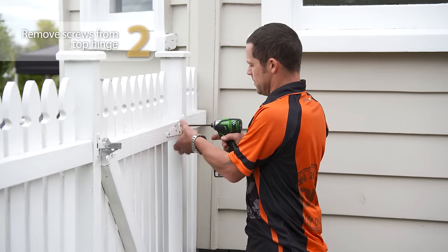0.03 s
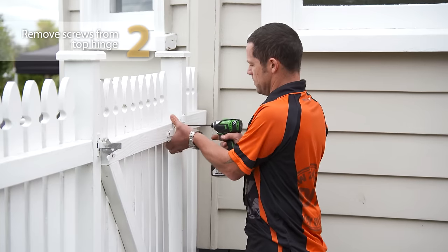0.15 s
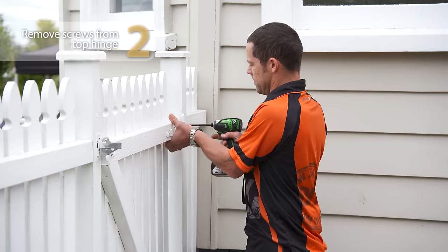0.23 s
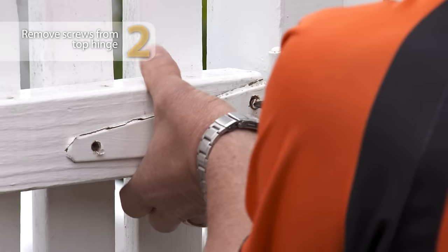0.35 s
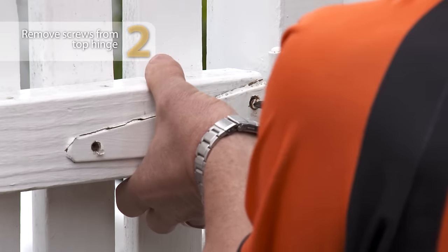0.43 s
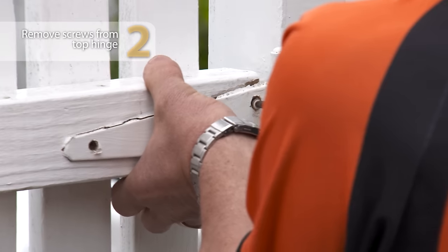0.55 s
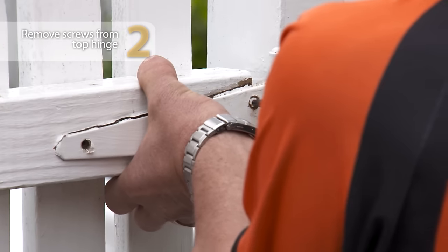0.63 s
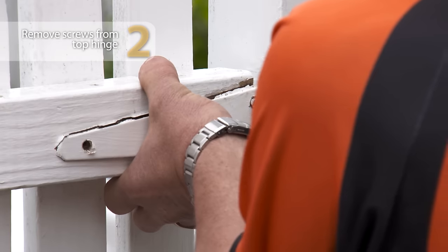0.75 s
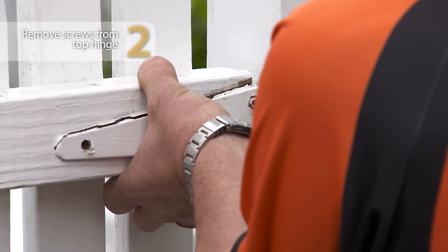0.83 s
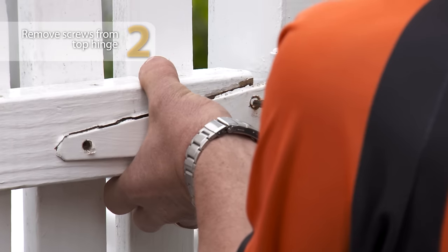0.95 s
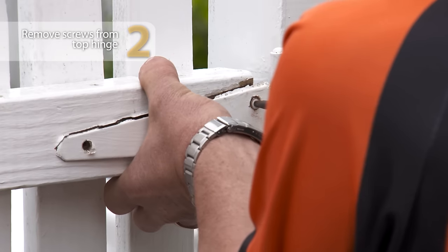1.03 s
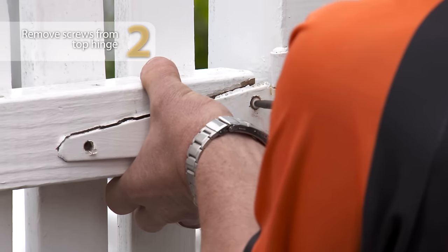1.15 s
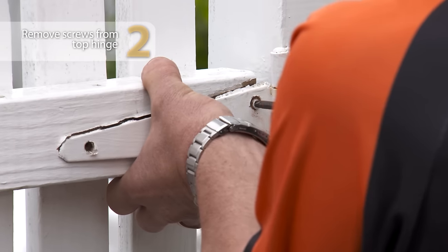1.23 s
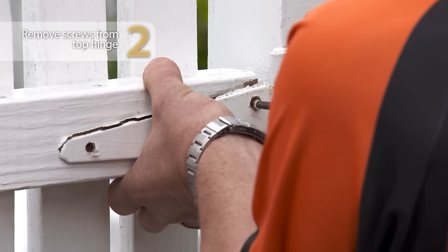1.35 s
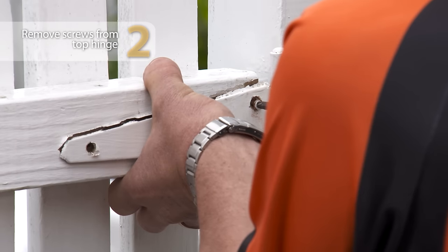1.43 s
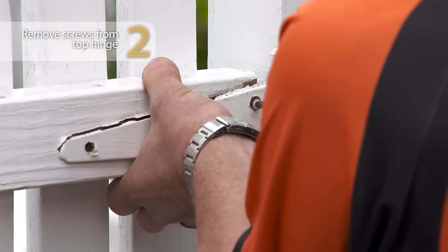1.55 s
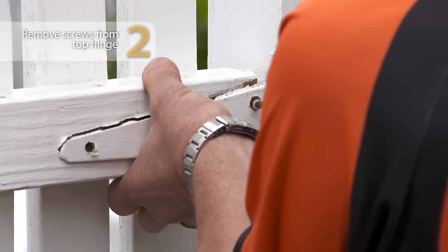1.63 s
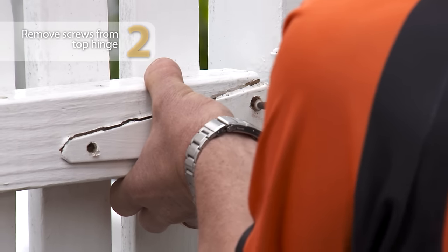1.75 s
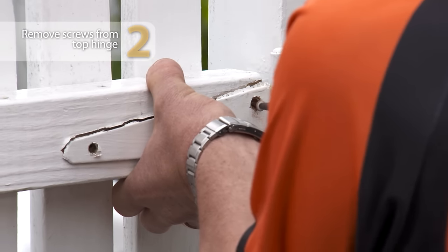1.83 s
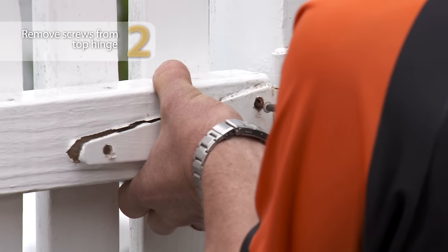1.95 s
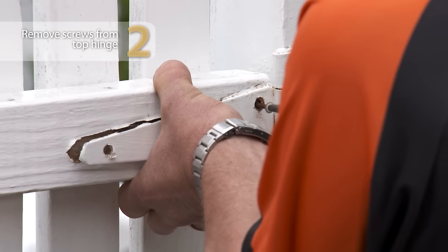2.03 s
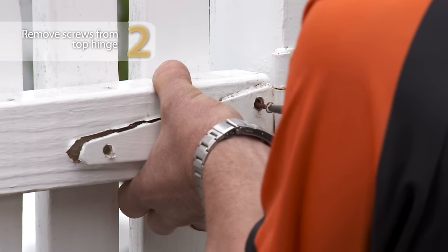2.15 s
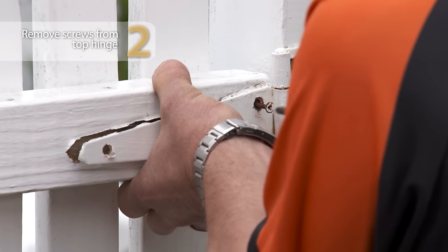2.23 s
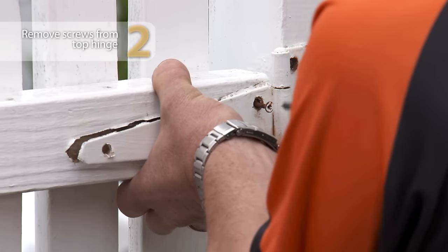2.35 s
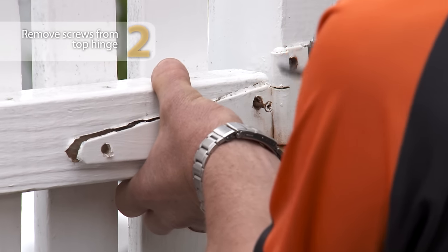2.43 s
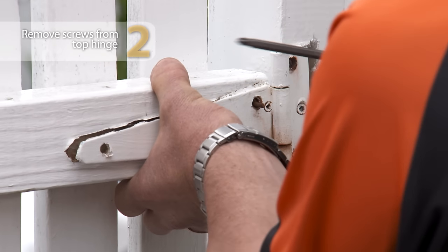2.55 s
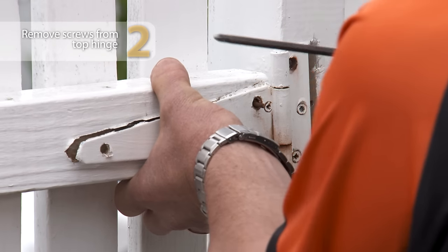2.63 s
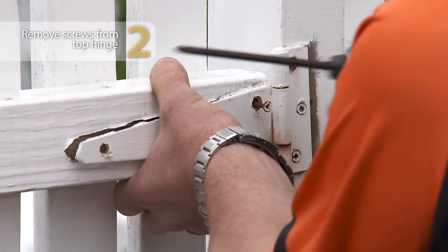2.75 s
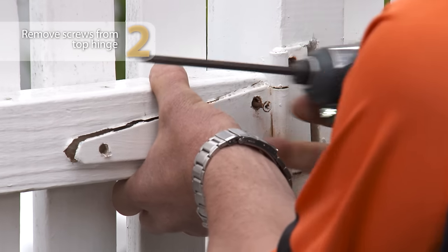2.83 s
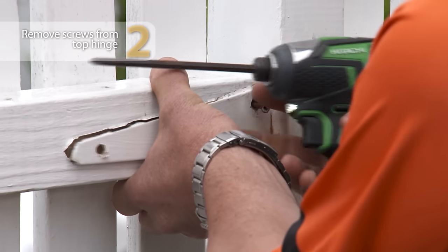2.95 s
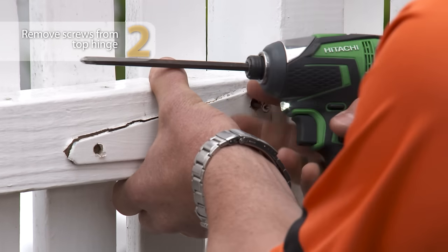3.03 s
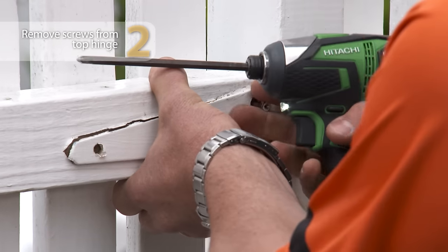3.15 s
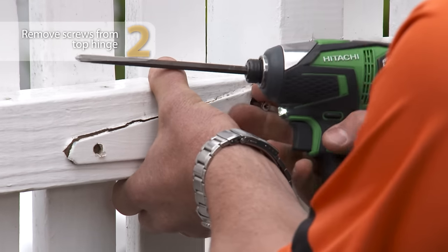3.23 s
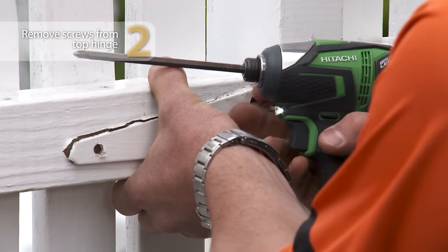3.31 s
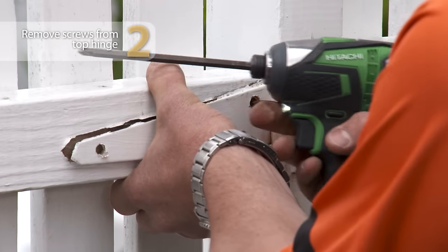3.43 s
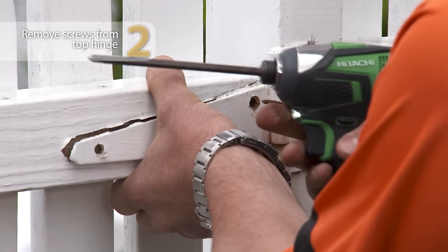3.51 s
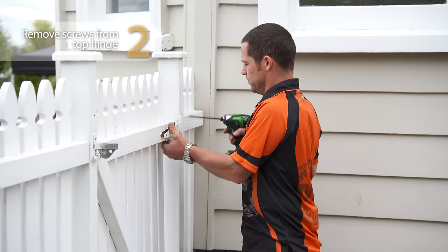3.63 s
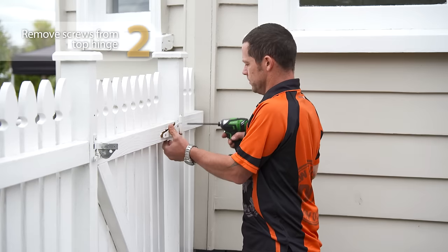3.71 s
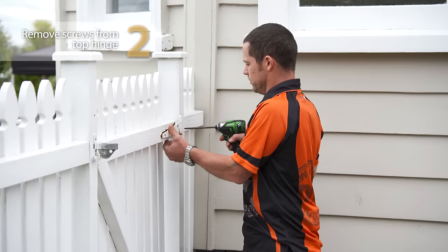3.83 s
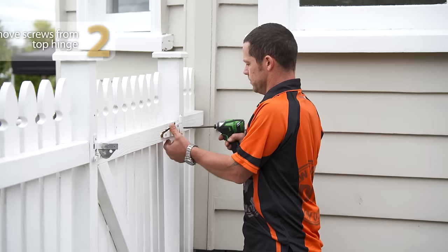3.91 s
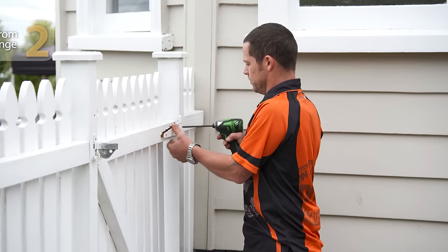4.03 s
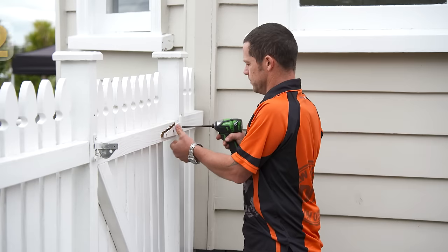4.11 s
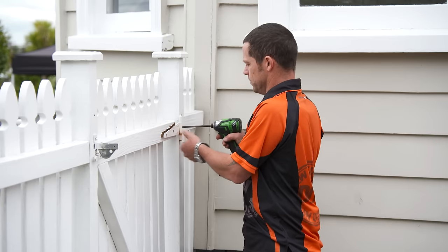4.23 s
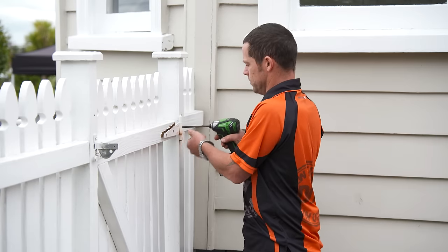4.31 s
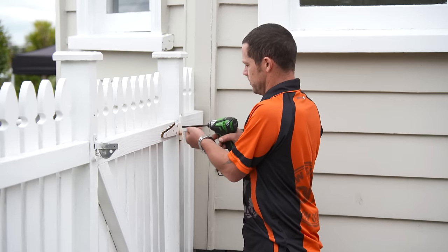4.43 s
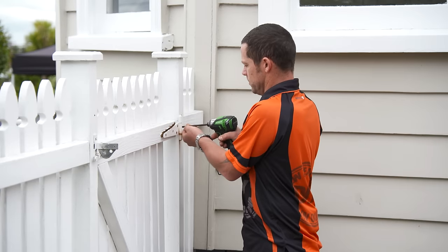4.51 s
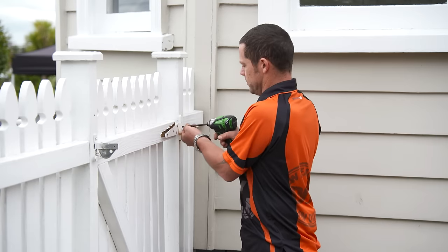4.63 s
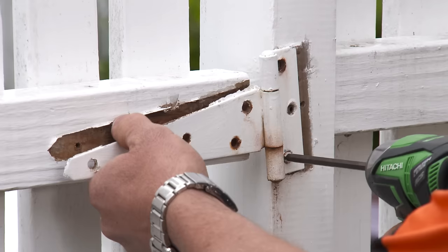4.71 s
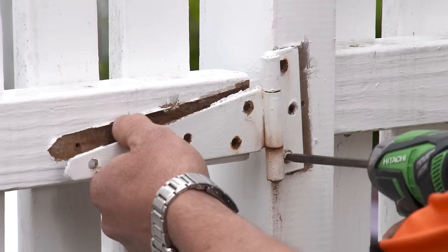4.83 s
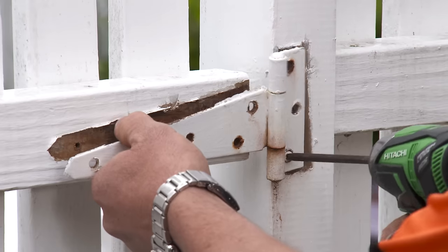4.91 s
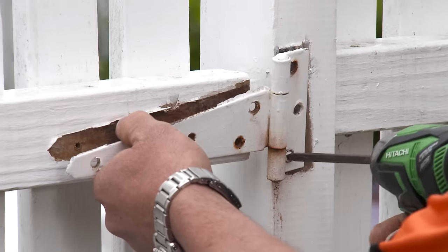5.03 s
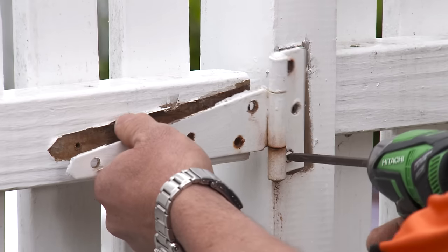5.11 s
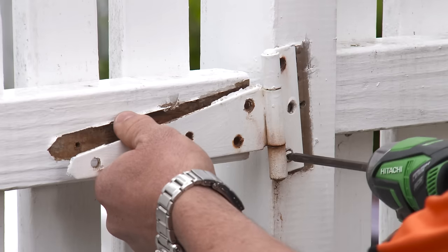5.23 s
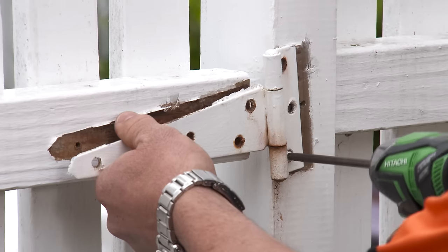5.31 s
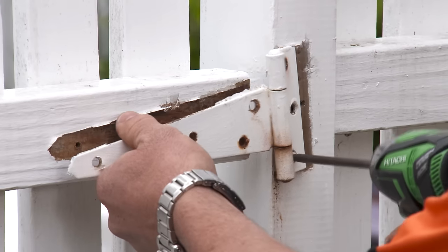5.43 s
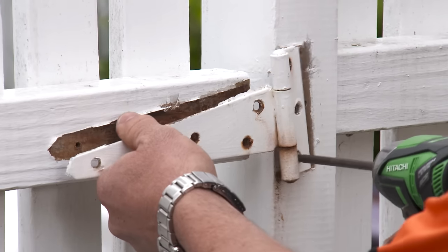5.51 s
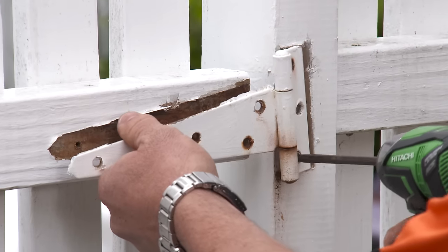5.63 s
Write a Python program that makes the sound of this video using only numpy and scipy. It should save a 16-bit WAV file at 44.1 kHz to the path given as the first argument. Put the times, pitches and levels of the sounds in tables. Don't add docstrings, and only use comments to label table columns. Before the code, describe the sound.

Outdoors, close up, a power driver whines and rattles while loosening hinge screws, then after a gap clatters in two hard impact bursts.

```python
import sys
import numpy as np
from scipy import signal
from scipy.fft import rfft, irfft
from scipy.io import wavfile
from scipy.ndimage import uniform_filter1d

SR = 44100
rng = np.random.default_rng(int(sys.argv[2]) if len(sys.argv) > 2 else 0)


def master(y):
    cut = np.clip(np.atleast_2d(y).T, -1, 1)
    pcm = np.round(cut * 32767)
    wavfile.write(sys.argv[1], SR, pcm.astype(np.int16))


def gain_from_db(level_db):
    decades = np.asarray(level_db, float) / 20
    return 10 ** decades


N = 249867
T = np.arange(N) / SR
SHORT, LONG = T[:3000], T[:6000]


def colour(x, points):
    hz, db = np.transpose(points)
    grid = np.fft.rfftfreq(x.shape[-1], 1 / SR) + 1
    gain = gain_from_db(np.interp(np.log(grid), np.log(hz), db))
    return irfft(rfft(x) * gain, x.shape[-1])


def unit(x):
    return x / np.sqrt(np.mean(x ** 2))


def walk(rate):
    levels = rng.standard_normal(size=8192)
    steps = levels[(T * rate).astype(int)]
    return unit(uniform_filter1d(steps, int(SR / rate)))


def control(tables, axis, off):
    out = np.full(N, float(off))
    for rows in map(np.array, tables):
        inside = (T >= rows[0, 0]) & (T <= rows[-1, 0])
        out[inside] = np.interp(T[inside], rows[:, 0], rows[:, axis])
    return uniform_filter1d(out, size=64)


def during(spans, rise, fall):
    levels = []
    for start, end, *db in spans:
        levels.append(sum(db) - rise * np.maximum(start - T, 0) - fall * np.maximum(T - end, 0))
    return np.max(levels, axis=0)


def ring(t, modes, scatter_db, stretch):
    hz, db, t60 = np.transpose(modes)[:, :, None]
    level, detune, phase = rng.standard_normal((3, len(modes), 1))
    fading = gain_from_db(db + scatter_db * level - 60 * t / (t60 * stretch))
    tones = np.sin(2 * np.pi * hz * (1 + 0.019 * detune) * t + phase)
    return (fading * tones).sum(axis=0)


def add(out, s, sound, db):
    i = int(s * SR)
    out[i:i + len(sound)] += (sound * gain_from_db(db) / np.abs(sound).max())[:N - i]


# (time [s], rate of current switching inside the motor [Hz])
MOTOR_SPEED = [
    [(.536, 88), (.601, 589), (.645, 900), (.665, 990), (.691, 914), (.76, 760)],
    [(1.085, 57), (1.16, 680), (1.2, 968), (1.225, 1100), (1.245, 1125), (1.27, 1030), (1.3, 915),
     (1.36, 780)],
    [(1.54, 40), (1.698, 1285), (1.758, 1510), (1.823, 1555), (1.948, 1575), (2.02, 1558), (2.073, 1497),
     (2.198, 1233), (2.48, 770)],
    [(4.775, 12), (4.855, 118), (4.89, 360), (4.93, 600), (5.04, 800), (5.1, 260), (5.16, 130), (5.33, 110)],
    [(5.338, 63), (5.445, 870), (5.5, 1050), (5.556, 990), (5.58, 625), (5.645, 70), (5.665, 40)],
]
# (brake time [s], fade [dB/s], rattle level [dB], share into the gate [dB], gear whine level [dB])
PULLS = [(0.697, 444, 1.5, -8.5, 2), (1.297, 517, 0, -6, -0.5), (2.413, 850, 0, -9.5, -2.5),
         (5.05, 35, -0.5, 1, -1), (5.64, 100, -1, -3, -16)]
TOP_RATE = 1500


def running():
    rate = control(MOTOR_SPEED, axis=1, off=0)
    rate = np.where(rate > 600, uniform_filter1d(rate, size=700), rate)
    slowing = np.clip(-np.gradient(rate) * SR / 900, 0, 1)
    coast = uniform_filter1d(slowing, size=1500)
    later_starts = [rows[0][0] for rows in MOTOR_SPEED[1:]]
    brake_s, fade_rate, *pull_db = np.array(PULLS)[np.searchsorted(later_starts, T)].T
    fade_db = -fade_rate * np.maximum(T - brake_s, 0)
    decades = np.log10(rate / TOP_RATE + 1e-5)
    return rate, decades, coast, fade_db, pull_db


# (frequency [Hz], level [dB])
HOUSING = [(7500, 5), (8300, -1), (8750, 1.5), (9100, 0), (9600, -11.5), (10300, -2), (10800, -21.5),
           (11200, -1.5), (11600, -18)]
# (start [s], end [s], level [dB])
CHOPPING = [(.54, .665, -0.5), (1.09, 1.205, 1.5), (1.21, 1.305, -8), (1.545, 1.69, 3), (2.15, 2.41, -2),
            (4.83, 4.92, 2), (5.34, 5.41, 2.5), (5.55, 5.645, -5.5)]
# (rate [Hz], level [dB])
CHOPPER_LEVEL = [(100, -43), (370, -37.5), (720, -33.5), (1000, -40), (1300, -38)]
CARRIER_HZ = 9958


def chopper(rate, turn):
    hz, db = np.transpose(HOUSING)
    tones = 0
    for k, side_db in zip((-1, 1, -2.3, 0.93), (-1, 0, -2.5, -16)):
        housing_db = np.interp(CARRIER_HZ + k * rate, hz, db)
        gain = gain_from_db(side_db - (abs(k) - 1) * rate / 70 + housing_db + 2.4 * walk(90))
        tones = tones + gain * np.sin(2 * np.pi * CARRIER_HZ * T + k * turn)
    buzz = unit(colour(rng.standard_normal(N), [(8300, -45), (8900, 6), (9200, -6), (9700, -38)]))
    tones = tones + gain_from_db(-15.0 - rate / 60) * buzz
    level_db = np.interp(rate, *np.transpose(CHOPPER_LEVEL)) + during(CHOPPING, rise=5000, fall=1500)
    return tones * gain_from_db(level_db + 1.0)


# (multiple of the motor rate, level [dB])
FAN = [(3.5, 0), (7, -7)]


def fan(rate, turn, fade_db):
    tones = sum(gain_from_db(db + 1.2 * walk(60)) * np.sin(k * turn + 0.35 * walk(160)) for k, db in FAN)
    level_db = -36 - 0.05 * np.maximum(1490 - rate, 0) + fade_db
    return tones * gain_from_db(level_db + 4.5)


# (multiple of the motor rate, level [dB])
MESH = [(1.568, 0), (1.507, -4), (3.0, -19), (4.53, -12), (4.7, -10)]
# (frequency [Hz], level [dB])
CASE = [(900, -3), (1700, 0), (2500, -1), (3500, 0), (4100, 6), (5400, 5), (6300, 1), (7400, 2)]


def gear_mesh(rate, decades, coast, turn, level_db):
    blur = (1 - 0.5 * coast) * rate / 7000
    tones = 0
    for k, db in MESH:
        case_db = np.interp(k * rate, *np.transpose(CASE))
        gain = gain_from_db(db + case_db + 3.5 * walk(110))
        tones = tones + gain * np.sin(k * (turn + blur * walk(200)))
    speeding_up = (np.gradient(rate) * SR > 5000) * np.clip(rate / 1300, 0, 1)
    level_db = level_db - 38 + 34 * decades - 4 * coast - 5 * speeding_up
    return tones * gain_from_db(level_db + 7.5)


def motor():
    rate, decades, coast, fade_db, (_, _, pull_mesh_db) = running()
    turn = 2 * np.pi * np.cumsum(rate) / SR
    whine = gear_mesh(rate, decades, coast, turn, pull_mesh_db + fade_db)
    return chopper(rate, turn) + fan(rate, turn, fade_db) + whine


# (frequency [Hz], level [dB per Hz])
GEARBOX = [(500, -33), (800, -17.5), (1200, -8.5), (1600, -8), (1950, -10.5), (2400, -4.5), (3100, -10),
           (5000, -8), (6000, -12), (7200, -10), (10300, -16), (13000, -20.5), (16000, -25)]
# (frequency [Hz], level [dB], time to fade 60 dB [s])
GATE = [(293.8, -11.5, 0.2), (358, -21, 0.022), (415, -9, 0.13), (485.7, -4, 0.14), (547, 4, 0.067),
        (613, -9.5, 0.17), (665, -10.5, 0.1), (776, -6.5, 0.079), (835, -7, 0.15), (947, 2.5, 0.026),
        (1046, 6, 0.035), (1176, -4.5, 0.052), (1292, -13, 0.11), (1592, -2.5, 0.067), (1853, 7, 0.029),
        (2160, 6.5, 0.015)]
# (start [s], end [s])
HAMMERING = [(4.885, 5.05), (5.365, 5.555)]
SCREW_FREE_S = 2.15


def rattle():
    rate, decades, coast, fade_db, (pull_rattle_db, gate_share_db, _) = running()
    clicks = rng.standard_normal(N) * gain_from_db(1.8 * walk(900) + 0.6 * walk(70))
    bright = unit(colour(clicks, GEARBOX))
    top = colour(bright, [(5000, -15), (8000, 4.5)])
    bright = bright + (gain_from_db(-5.5 + rate / 250) - 1) * top
    chuck = unit(colour(clicks, [(1600, -34), (1900, 1), (2000, 13.0), (2350, -35)]))
    chuck = gain_from_db(-16 - rate / 120) * chuck
    wood = signal.fftconvolve(clicks, ring(SHORT, GATE, scatter_db=-1.5, stretch=0.45))[:N]
    crawl_db = -400 / (rate + 20)
    db = -30 + 16 * decades - 2 * coast + crawl_db + pull_rattle_db + fade_db
    db = db + np.maximum(5 + during(HAMMERING, rise=270, fall=340), 0)
    screw_loose = (T > SCREW_FREE_S) * (T < MOTOR_SPEED[3][0][0])
    gate_db = gate_share_db + 700 / (rate + 60) - 12.5 * screw_loose
    return gain_from_db(db + 1.0) * (bright + chuck) + gain_from_db(db + gate_db - 1.5) * unit(wood)


# (frequency [Hz], level [dB], time to fade 60 dB [s])
BIT = [(2850, -3.5, 0.06), (4240, -5, 0.037), (4680, 0, 0.0069), (5700, -0.5, .04), (6120, 7, 0.018),
       (7180, 4.5, 0.029), (7510, -0.5, 0.015), (9250, -10, 0.03), (10300, -2, .03), (12600, -8, 0.018),
       (13750, 2, 0.023)]


def strike(hz, t60, crack_db, body_db, top_db):
    t = SHORT
    onset = 1 - np.exp(-t / 0.00024)
    crack_colour = [(800, -22), (hz * 0.56, -5), (hz, 0), (hz * 1.55, -4), (16000, top_db)]
    crack = unit(colour(rng.standard_normal(len(t)), crack_colour))
    crack = gain_from_db(crack_db - 60 * t / (0.85 * t60)) * crack
    main = ring(t, [(hz, 0, t60), (hz * 1.08, -5, t60)], scatter_db=6.0, stretch=0.95)
    body = gain_from_db(body_db) * ring(t, BIT, scatter_db=-0.5, stretch=t60 / 0.071)
    return onset * (crack + main + body)


def thud():
    return ring(LONG, GATE, scatter_db=3.0, stretch=0.7) * (1 - np.exp(-LONG / 0.0009))


# (first contact [s], last contact [s], peak level [dB], gate thud [dB], brightest ring [Hz])
BLOWS = [(4.883, 4.8817, -18.5, -28.5, 4760), (4.906, 4.909, -5, -26, 7300),
         (4.93, 4.942, -3.5, -20.5, 8100), (4.9634, 4.9724, -5, -23, 7220), (4.995, 5.004, -7, -21.5, 8500),
         (5.0267, 5.0402, -6, -21, 6870), (5.3755, 5.387, -11.5, -22.5, 6360),
         (5.3946, 5.3993, -5.5, -29, 6800), (5.42, 5.429, -5, -17.5, 9000), (5.451, 5.455, -6, -21, 10000),
         (5.4825, 5.482, -8.5, -49, 6900), (5.513, 5.512, -7, -31, 7300), (5.5364, 5.5426, -6.5, -24, 6750)]
# (place between first and last [0-1], level [dB], pitch [ratio])
CONTACTS = [
    (0, -4, .75),
    (0.499, -4.5, .8),
    (0.998, 0.5, 1.0),
]


def hammer():
    out = np.zeros(N)
    for first, last, db, thud_db, hz in BLOWS:
        for share, contact_db, pitch in CONTACTS:
            s = first + share * (last - first)
            top_db = 1.16 * (db + contact_db) - 4.5
            hit = strike(hz * pitch, t60=0.025, crack_db=12.5, body_db=4.0, top_db=top_db)
            add(out, s, hit, db + contact_db - 1.5)
            add(out, s, thud(), thud_db + 4)
    return out


# (time [s], peak level [dB], ring [Hz], gate thud [dB])
KNOCKS = [(0.5405, -29, 5600, -51), (.547, -19.5, 4920, -50), (.7323, -41, 4440, -42.5),
          (.764, -42, 10500, -55), (.769, -38, 7400, -50), (.7754, -32.5, 5700, -51),
          (.788, -31, 6240, -44), (0.7988, -19.5, 9330, -46.5), (.803, -25, 3350, -38.5),
          (.809, -32.5, 818, -40.5), (2.427, -31.5, 1930, -65), (2.4568, -37.5, 4060, -51),
          (2.498, -42.5, 3320, -60), (2.5148, -45, 5340, -56.5), (5.0526, -23, 4940, -55),
          (5.083, -31.5, 6430, -51), (5.114, -34.5, 5900, -70), (5.1427, -41, 6400, -72),
          (5.1515, -39.5, 6000, -67), (5.595, -32, 3940, -46), (5.621, -41, 4300, -61),
          (5.6512, -34, 6160, -53)]


def knocks():
    out = np.zeros(N)
    for s, db, hz, thud_db in KNOCKS:
        t60 = 0.018 + 180 / hz * 0.74
        add(out, s, strike(hz, t60, crack_db=10, body_db=-11, top_db=0.92 * db - 5.5), db)
        add(out, s, thud(), thud_db + 12.5)
    return out


# (time [s], peak level [dB], ring [Hz])
SCREW_RINGS = [(1.9, -24, 4696), (2.1169, -14, 3510), (2.1364, -16, 2740), (2.148, -16, 2490),
               (2.166, -17, 2130), (2.218, -18, 1806), (2.2309, -16, 2160), (5.147, -40, 917)]


def screw_rings():
    out = np.zeros(N)
    for s, db, hz in SCREW_RINGS:
        add(out, s, strike(hz, 255 / hz, crack_db=-1.5, body_db=-12.5, top_db=-21), db)
        add(out, s, thud(), db - 22.5)
    return out


# (time [s], length [s], start pitch [Hz], end pitch [Hz], level [dB])
BIRDS = [
    (.45, .04, 4400, 4350, -55),
    (2.775, .03, 4350, 4650, -53),
    (2.64, .1, 4300, 4200, -66),
    (3.18, .04, 3700, 3550, -66),
    (.24, .26, 6850, 7000, -67),
]


def birds():
    out = np.zeros(N)
    for s, length, start_hz, end_hz, db in BIRDS:
        hz = np.linspace(start_hz, end_hz, int(length * SR))
        whistle = np.hanning(len(hz)) * np.sin(2 * np.pi * np.cumsum(hz) / SR)
        add(out, s, whistle, db)
    return out * gain_from_db(3.0 * walk(150) - 1.5)


# (frequency [Hz], level [dB per Hz])
YARD = [(20, -9), (60, -4.5), (130, -1.5), (293, -4), (380, -5), (545, -2.5), (760, -1.5), (1000, -11.5),
        (1500, -16), (3720, -25.5), (5200, -29.5), (7500, -32.5), (14800, -37), (16000, -37)]
# (frequency [Hz], side level minus middle level [dB])
YARD_SIDE = [(25, -1.5), (50, -6), (110, -7.5), (200, -4), (380, -7), (700, -11.5), (1290, -6.5),
             (2380, -9.5), (4400, -2.5), (8120, -.7), (15000, 0)]
# (time [s], level [dB])
YARD_SWELL = [(0, 1.5), (1.4, 3.5), (2.6, 1.5), (3.2, 0), (4.4, 0), (5.3, 1), (5.67, 3)]


def yard():
    low, high, side = rng.standard_normal((3, N))
    traffic = colour(low, [(500, 0), (1500, -13)]) * gain_from_db(0.6 * walk(2.6))
    leaves = colour(high, [(300, -29), (1000, 0.5)]) * gain_from_db(0.6 * walk(3.1))
    mid, side = colour(np.array([traffic + leaves, colour(side, YARD_SIDE)]), YARD)
    cricket_band = [(7300, -16), (8200, 2.5), (8600, 1), (8900, -11), (9400, -39)]
    crickets = unit(colour(rng.standard_normal((2, N)), cricket_band)) * gain_from_db(1.2 * walk(11))
    left_right = np.array([mid + side, mid - side]) / mid.std()
    level_db = -50 + np.interp(T, *np.transpose(YARD_SWELL))
    return gain_from_db(level_db) * (left_right + gain_from_db(-19.5) * crickets)


def wall_echo(tool):
    t = T[:12000]
    early, tail = rng.standard_normal((2, 2, len(t)))
    early = unit(colour(early[0], [(9000, 0), (13000, -3)]) * np.exp(-t / 0.01))
    early = early / np.sqrt(len(t)) * np.array([[1], [-1]])
    tail = colour(tail, [(200, 3), (800, 3), (4000, 17), (16000, -12)])
    fading = gain_from_db(-60 * t / 0.12) + gain_from_db(-18 - 60 * t / 0.93)
    tail = tail * fading * (t > 0.006)
    echo = gain_from_db(-17.5) * early + gain_from_db(-25.5) * unit(tail) / np.sqrt(len(t))
    return signal.fftconvolve(tool[None], echo, axes=1)[:, :N]


def scene():
    tool = motor() + rattle() + hammer() + knocks() + screw_rings() + birds()
    tool = colour(tool, [(120, -16.5), (260, -2), (330, 1)])
    return tool + wall_echo(tool) + yard()


def top_cut(x):
    return signal.sosfilt(signal.butter(12, 16970, fs=SR, output="sos"), x)


def record(dry):
    mix = colour(dry, [(15500, -0.5), (15850, -6), (16000, -50), (16700, -73)])
    return top_cut(mix)


dry = scene()
out = record(dry)
master(out)
```